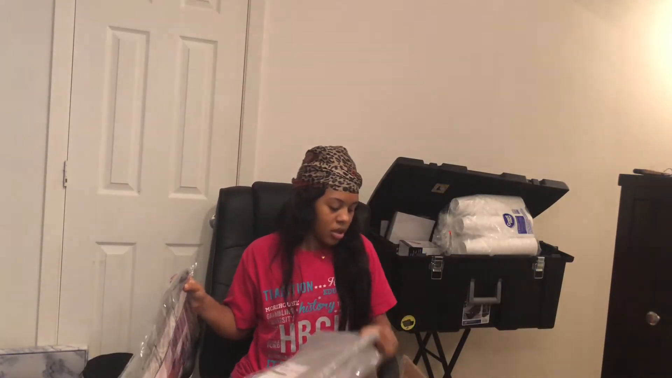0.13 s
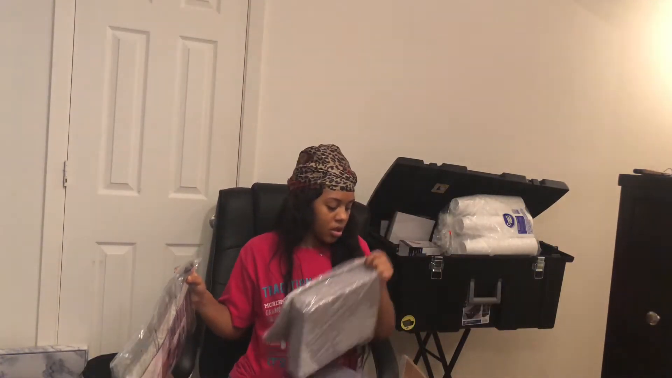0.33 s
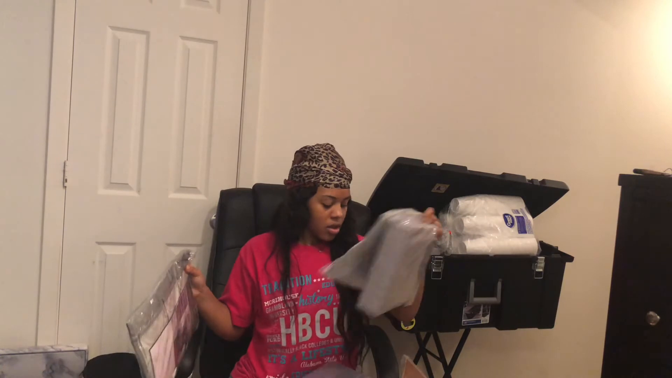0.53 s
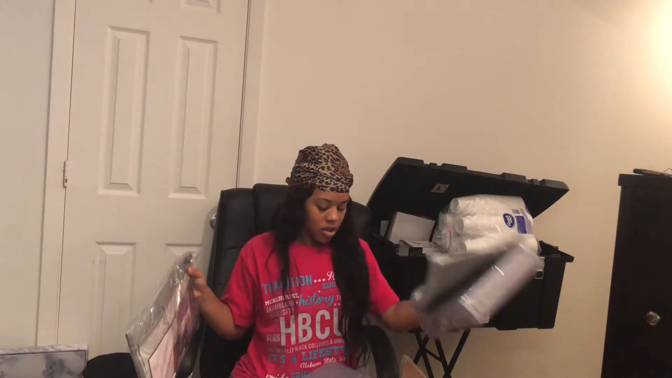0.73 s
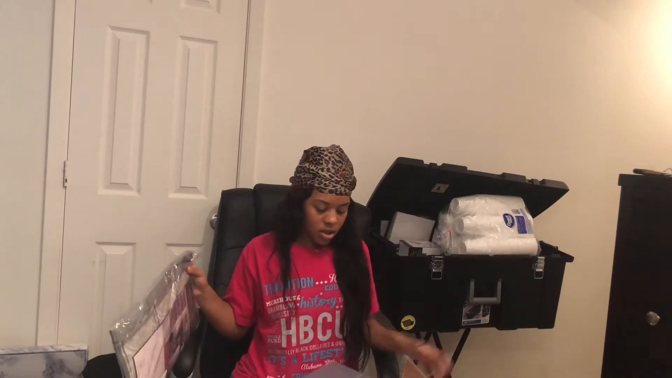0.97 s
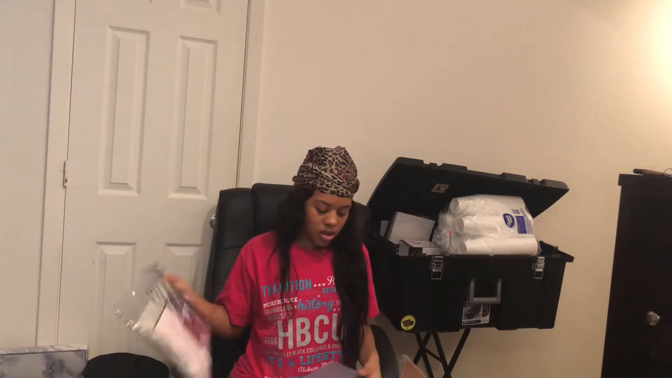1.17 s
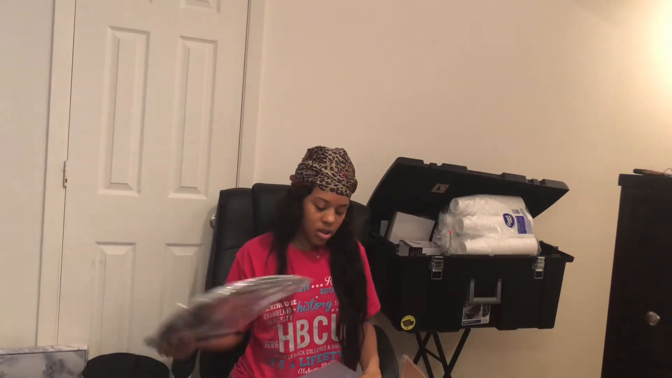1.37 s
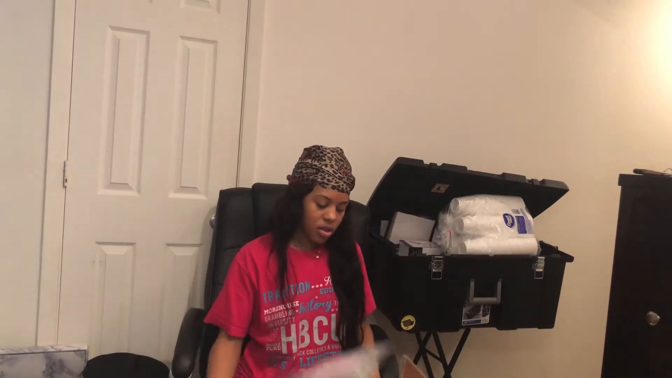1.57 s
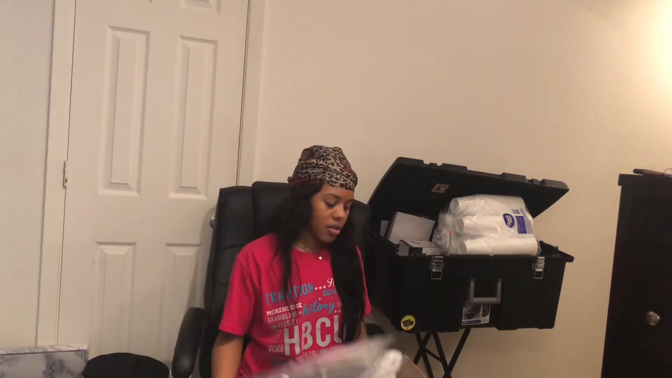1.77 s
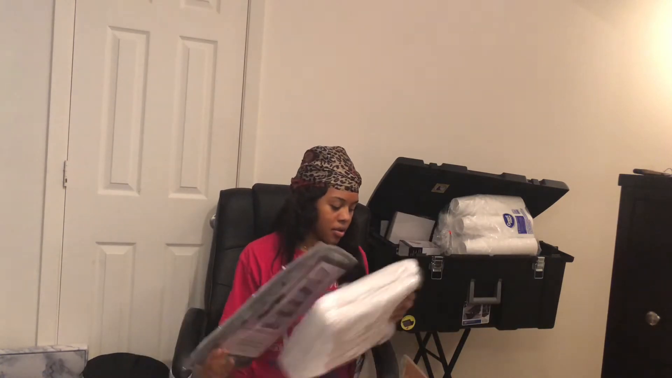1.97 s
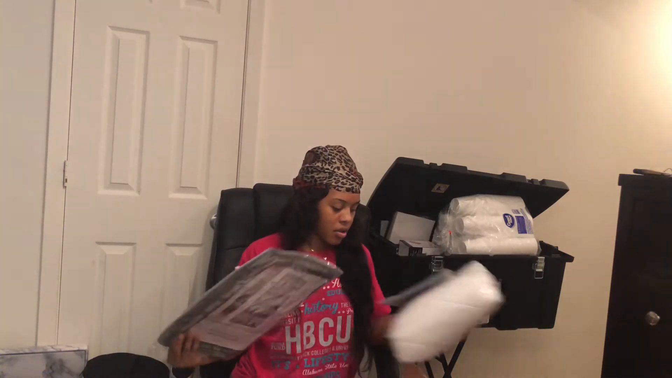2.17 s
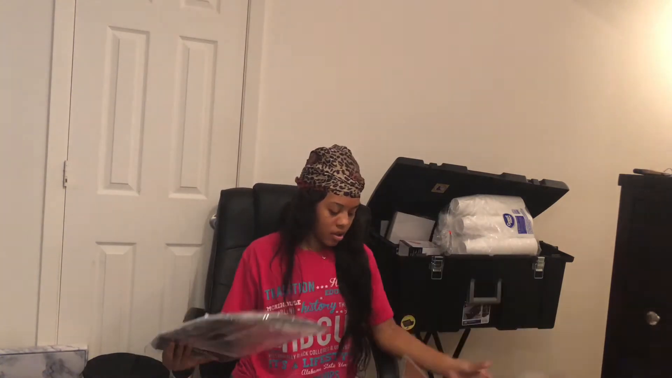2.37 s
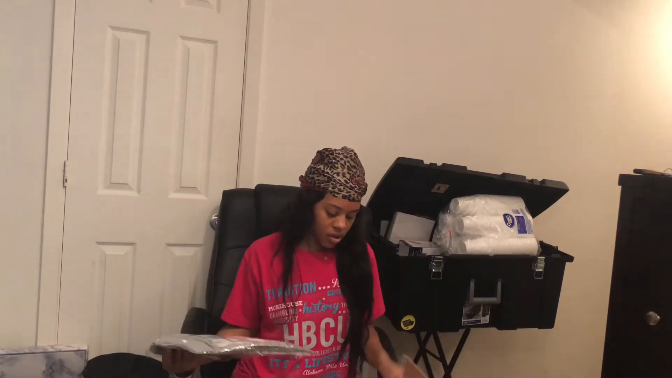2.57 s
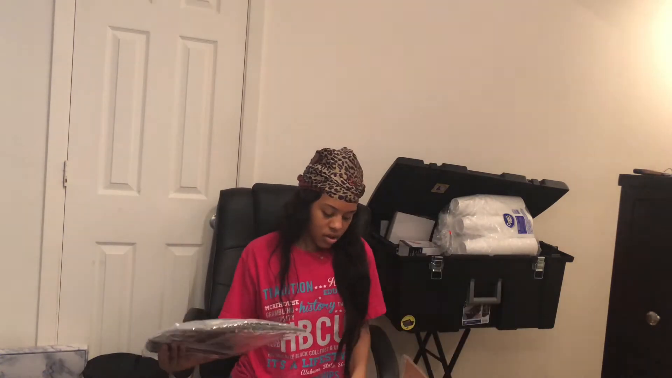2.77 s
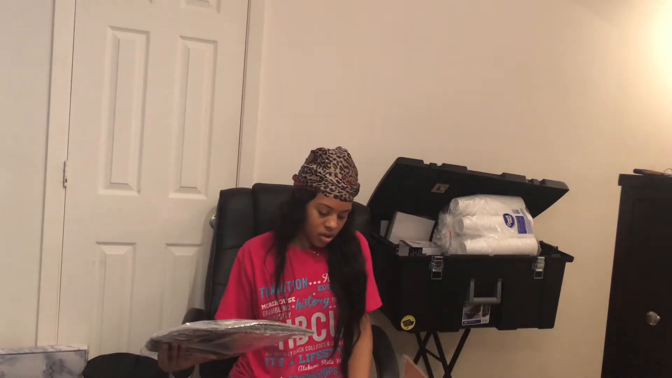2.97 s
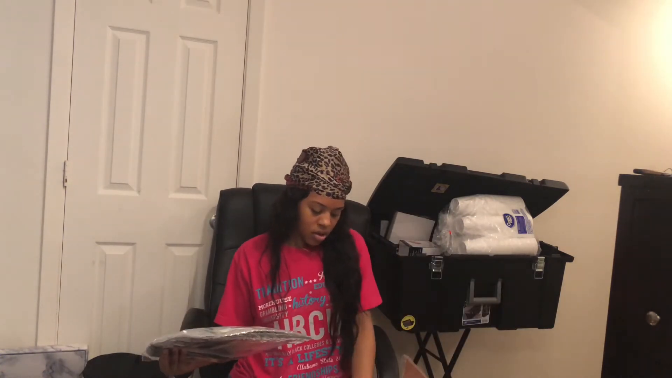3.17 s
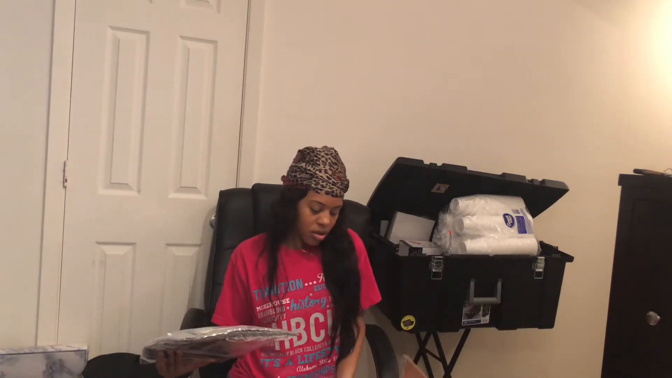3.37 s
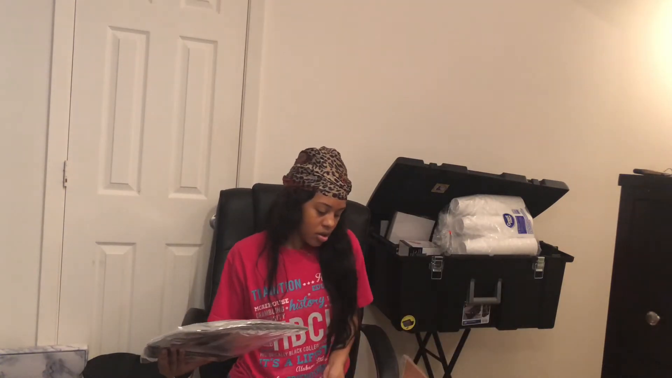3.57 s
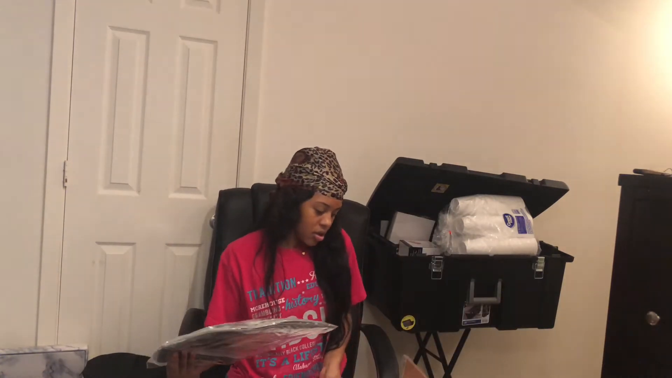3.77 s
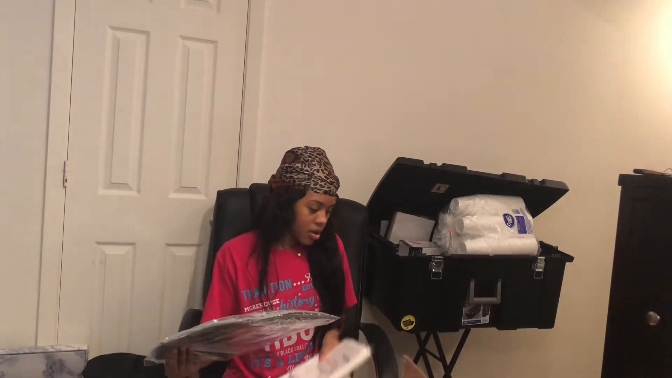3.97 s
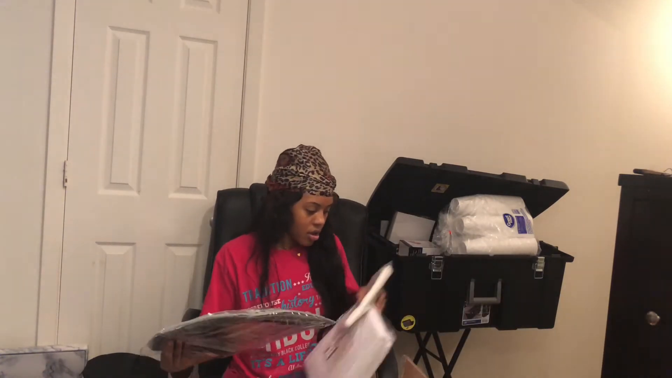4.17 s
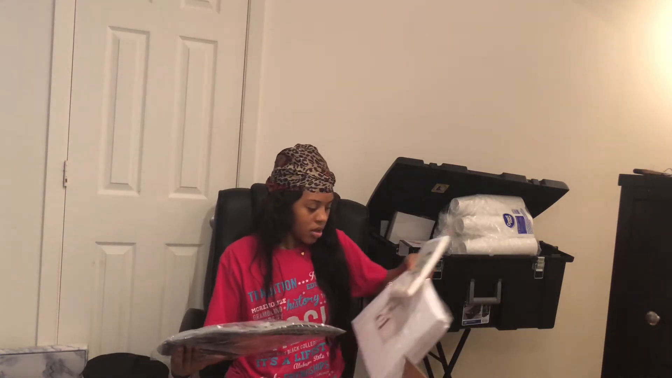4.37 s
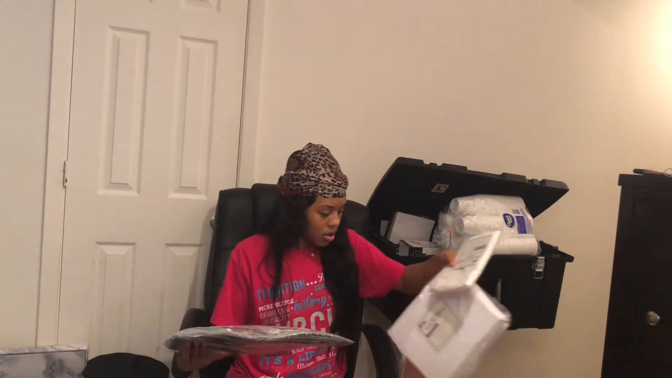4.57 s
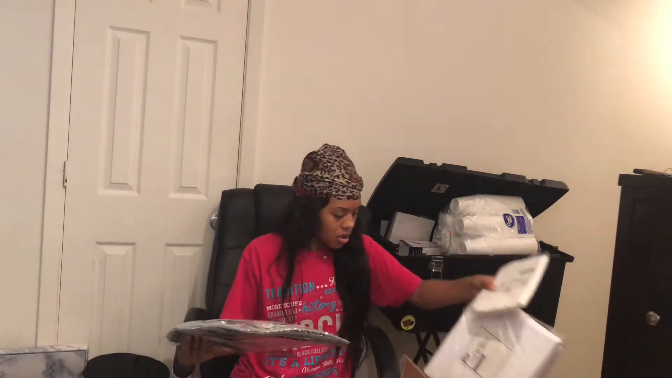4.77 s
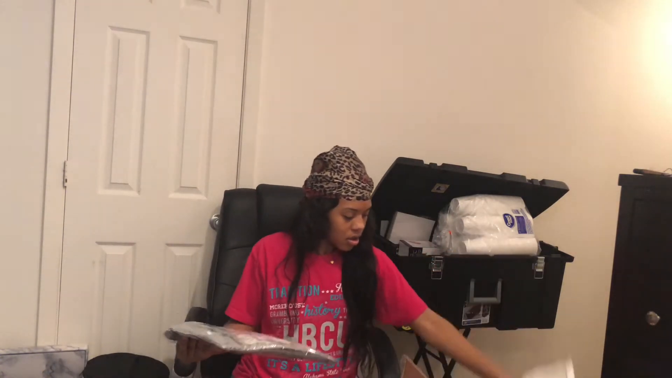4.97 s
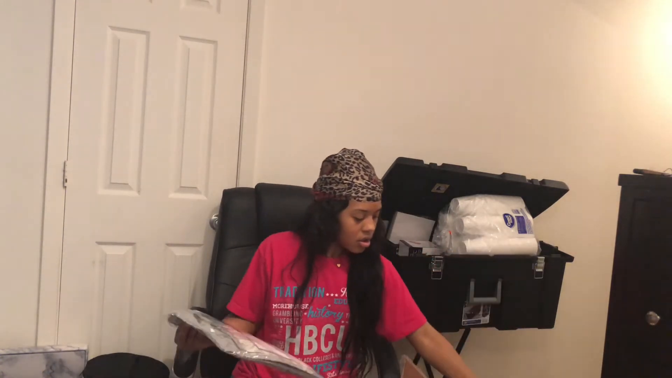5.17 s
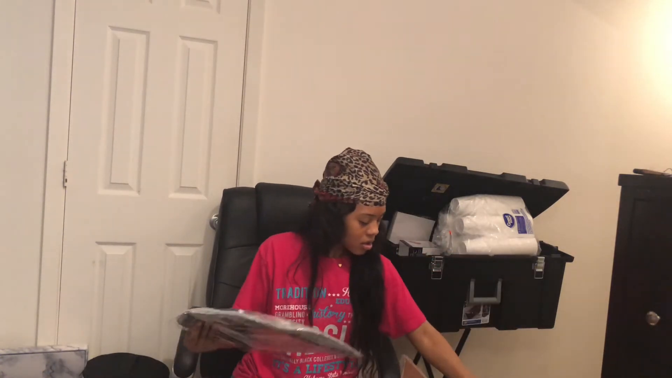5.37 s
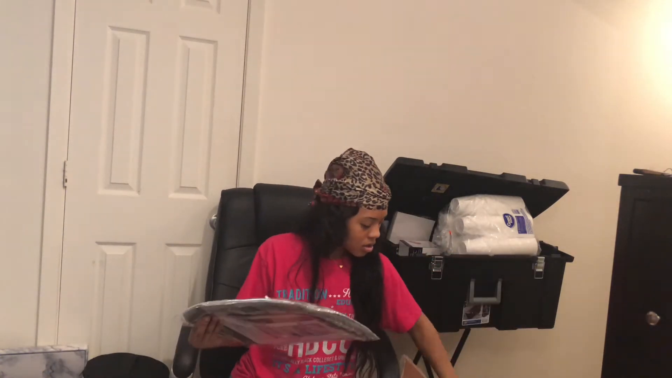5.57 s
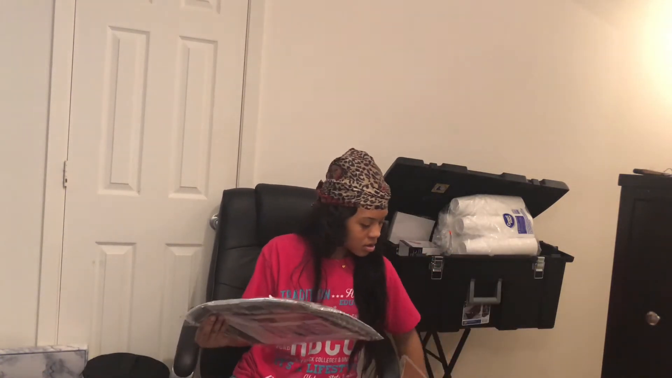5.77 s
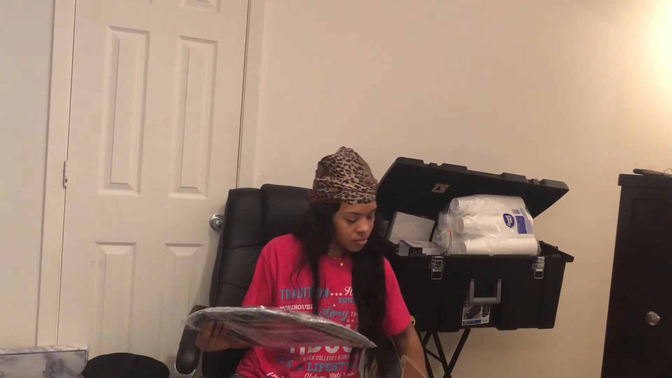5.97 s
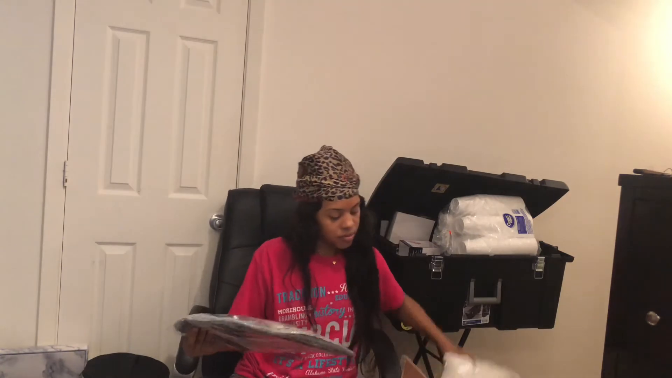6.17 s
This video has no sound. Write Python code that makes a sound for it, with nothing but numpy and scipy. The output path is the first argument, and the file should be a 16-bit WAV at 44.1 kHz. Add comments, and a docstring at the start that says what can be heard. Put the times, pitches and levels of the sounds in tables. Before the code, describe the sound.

In a small, quiet bedroom, thin plastic wrap crinkles and snaps sharply as flat packs are handled. Packs land on a pile with crisp crushes and short dull thuds, the heaviest about two and a half seconds in. Light rustling follows, then another landing, and finally a hand knocks faintly inside a cardboard box. The microphone is a few steps away, catching a short room tail.

```python
"""Thin plastic wrap crinkles and snaps close to the hands; flat packs are picked up, dropped on a pile and held.
Bending film is clumps of tiny buckles over hiss, and a crease is a short burst of filtered noise.
A landing crushes the wrap, rings the filling's damped modes and puffs out air; film squeaks faintly at times.
Late on, a hand knocks about in a cardboard box. Soft, still air lies under everything.
It is a small bedroom with the microphone a few steps away, so echoes and a short tail follow the sounds."""
import sys
import numpy as np
from scipy import signal
from scipy.fft import rfft, irfft, next_fast_len
from scipy.io import wavfile
from scipy.ndimage import uniform_filter1d

SR = 44100
rng = np.random.default_rng(int(sys.argv[2]) if len(sys.argv) > 2 else 0)


def dump(signal):
    """Clip the signal to [-1, 1] and save it as 16-bit WAV at the path in sys.argv[1]."""
    limited = np.clip(np.atleast_2d(signal).T, -1, 1)
    pcm = np.round(limited * 32767).astype(np.int16)
    wavfile.write(sys.argv[1], SR, pcm)


N = 273861
TIME = np.arange(N) / SR
CUTOFF_HZ = 16000   # upper limit of the snaps and of the whole sound

# All table levels are relative: the functions and the room add their own gains.
# a pack is bumped in the hand or lap:
# (time [s], thud level [dB], hardness of the contact as a low-pass [Hz], crush level of the wrap [dB])
BUMPS = [(0.0185, -43, 2500, -32.5), (0.1413, -34, 1800, -38.5), (0.2623, -26, 1230, -43),
         (1.83, -26.5, 1210, -33), (3.969, -36.5, 600, -60), (4.2725, -45, 1000, -47)]
# a pack lands on one edge and tips flat:
# (edge time [s], edge crush level [dB], edge thud level [dB],
#  flat time [s], flat crush level [dB], flat thud level [dB], level of the puff of air [dB])
LANDINGS = [(1.026, -29, -25.5, 1.098, -25.5, -17, -38), (1.61, -46, -31, 1.674, -50, -35, -50),
            (2.486, -36, -24, 2.543, -19.5, -9, -47), (5.023, -40, -44, 5.048, -34.5, -22, -42)]
# a hand feels about in a cardboard box: (time [s], level [dB], hardness of the contact as a low-pass [Hz])
KNOCKS = [(5.651, -41, 1700), (5.664, -32.5, 460), (5.808, -38.5, 780), (5.852, -34.5, 2530),
          (5.872, -45.5, 1200), (5.972, -36.5, 484), (6.021, -46, 600), (6.074, -45, 250)]
BUMP_SWELL_S = 0.0018   # rise of a bump's crush and of a clack


def from_db(db):
    """Decibels to gain."""
    return 10 ** (np.asarray(db) / 20)


def rms_one(x):
    """Scale to an rms of 1."""
    return x / np.sqrt(np.mean(x ** 2) + 1e-20)


def butter(x, hz, kind, order=2):
    """Causal low-, high- or band-pass."""
    sections = signal.butter(order, np.clip(hz, 10, .48 * SR), kind, fs=SR, output="sos")
    return signal.sosfilt(sections, x)


def coloured(x, spectrum):
    """Give x a spectrum, with minimum phase so that nothing sounds early; rms 1."""
    hz, db = np.transpose(spectrum)
    size = 2 * next_fast_len(N)
    bins = np.maximum(np.arange(size // 2 + 1) * SR / size, 1)
    gain = from_db(np.interp(np.log(bins), np.log(hz), db))
    cepstrum = irfft(np.log(gain))
    # the doubled causal half of the cepstrum gives the minimum-phase response
    response = np.exp(rfft(2 * cepstrum[:size // 2], size))
    return rms_one(irfft(rfft(x, size) * response)[:N])


def drift(knots_per_s):
    """Chance values joined by straight lines, with a spread of 1 at the knots."""
    knots = rng.standard_normal(N)
    return np.interp(TIME * knots_per_s, np.arange(N), knots)


def surge(s, swell, fade, hold=0):
    """Rises to 1 at time s, holds and dies away; rise and fall are exponential."""
    before = (s - TIME) / swell
    after = (TIME - s - hold) / fade
    return np.exp(-np.clip(np.maximum(before, after), 0, 20))


def ring(x, modes):
    """A unit click sets each mode ringing at its level; neighbouring modes swing in opposite senses."""
    out = 0
    for k, (hz, db, t60) in enumerate(modes):
        r = from_db(-60 / (t60 * SR))   # decay per sample
        w = 2 * np.pi * hz / SR
        mode = signal.lfilter([0, r * np.sin(w)], [1, -2 * r * np.cos(w), r * r], x + 1e-18)
        out = out + (-1) ** k * from_db(db) * mode
    return out


def add(track, s, sound):
    """Mix a short sound into the track at time s."""
    start = max(int(s * SR), 0)
    track[start:start + len(sound)] += sound[:N - start]


def room(x, wet_db):
    """Near echoes, then a diffuse tail that builds up in a few milliseconds and whose treble dies first."""
    # walls and furniture close by: (delay [s], level [dB])
    near_echoes = [(.0022, -27), (.0051, -26)]
    t60_s, treble_t60_s, wall_cut_hz = 0.36, 0.21, 7000
    t = TIME[:SR // 2]
    noise = rng.standard_normal(len(t))
    dull = butter(noise, wall_cut_hz, "low", order=1)
    treble = noise - dull
    tail = dull * np.exp(-np.log(1000) * t / t60_s) + treble * np.exp(-np.log(1000) * t / treble_t60_s)
    tail = tail * (1 - np.exp(-t / .004))
    response = from_db(wet_db) * tail / np.linalg.norm(tail)
    for delay, db in near_echoes:
        add(response, delay, from_db([db]))
    return x + signal.fftconvolve(x, response)[:N]


def handling():
    """Levels in dB of the crinkle, its top octave and the flexing: every move swells, holds and settles."""
    # a hand lifts, turns or shifts a pack: (start [s], length [s], swell [s], crinkle level [dB],
    #  top octave against the crinkle [dB], flexing of the pack against the crinkle [dB])
    moves = [(0, 0.18, .01, -49, 0, -6), (0.236, .16, .02, -54.5, 2, -8),
             (0.439, 0.13, .02, -62.5, -7, -4.5), (0.826, 0.053, 0.044, -51.5, 1, -12.5),
             (0.913, 0.097, .02, -55.5, -6, -11), (1.14, 0.096, .02, -47.5, -3, -11),
             (1.335, .16, .015, -61, -4, 0.5), (1.638, .04, 0.02, -47.5, -2.5, 2.5),
             (1.777, 0.11, 0.068, -52, 3, -1), (1.962, .05, 0.018, -60, 3, 4),
             (2.348, 0.057, 0.037, -57.5, -3.5, 0), (2.591, .32, .02, -52, 1.5, -4.5),
             (2.953, 0.13, .02, -59.5, 1, -4.5), (3.147, 0.062, 0.027, -55, 0.5, 0.5),
             (3.239, .11, .02, -53, 2, -4), (3.532, 0.18, 0.065, -58.5, 2.5, -7.5),
             (3.832, 0.019, 0.015, -56.5, 2.5, -6.5), (3.939, 0.15, 0.013, -56.5, 2, -5.5),
             (4.154, 0.077, .02, -61, -2, -11), (4.484, 0.079, 0.069, -63, 1, -10),
             (4.636, 0.055, 0.014, -68.5, -2, -12), (4.88, .04, .015, -59.5, 2, -9),
             (4.971, 0.044, .03, -52.5, 3.5, -18), (5.071, 0.05, .02, -40, 3, -6),
             (5.172, 0.17, .02, -50, 2.5, -5), (5.526, 0.037, .05, -57.5, 0, -5.5),
             (5.82, .23, 0.075, -64, -2.5, 6), (6.155, 0.028, 0.02, -54.5, -9, 1)]
    holding_db, holding_crisp_db, holding_flex_db = -71, -5, 0   # a pack that is only held still stirs
    settle_s = 0.045   # after a move the film relaxes
    waver_db, wavers_per_s = 1.65, 30   # the pressure of the hand is never even
    power = from_db(holding_db + np.array([[0], [holding_crisp_db], [holding_flex_db]])) ** 2
    for s, length, swell, db, crisp_db, flex_db in moves:
        peaks = from_db(db + np.array([[0], [crisp_db], [flex_db]]))
        power = power + peaks ** 2 * surge(s, swell, settle_s, length) ** 2
    return 10 * np.log10(power) + waver_db * drift(wavers_per_s)


def buckles(per_s, spread_db, clump_db, rub):
    """Tiny buckles of uneven size come in clumps, over the hiss of sliding film; the slow level is even."""
    sizes = from_db(spread_db * np.minimum(rng.exponential(1, N), 4)) * rng.choice([-1, 1], N)
    happens = rng.random(N) < per_s / SR
    clicks = sizes * happens * from_db(clump_db * drift(350))
    clicks = clicks / np.sqrt(uniform_filter1d(clicks ** 2, size=1800) + 1e-6)
    return (clicks + rub * rng.standard_normal(N)) / np.sqrt(1 + rub ** 2)


def crinkle(level_db, crisp_db):
    """Folds buckle with a dull tick; small wrinkles join them in the top, which has its own level."""
    # how the film moves: (time [s], smooth sliding against buckling [dB])
    sliding = [(0, -8), (1.1, -2), (1.8, -9), (2.7, -1.5), (3.1, -4), (3.6, -10), (4.1, 0.5), (4.9, -13),
               (5.1, 17), (5.4, -3)]
    # spectrum of bending film: (frequency [Hz], density [dB per Hz])
    film_spectrum = [(300, -17), (700, 1.5), (1300, 3), (2400, 3.5), (3600, 4.5), (5500, 3.5), (8000, -3.5),
                     (11000, -7), (16000, -8)]
    s, rub_db = np.transpose(sliding)
    rub = from_db(np.interp(TIME, s, rub_db))
    folds, wrinkles = (coloured(buckles(per_s=1400, spread_db=1.5, clump_db=5.5, rub=rub), film_spectrum)
                       for _ in range(2))
    body = butter(folds, 7600, "low", order=3)
    top = butter((folds + wrinkles) / np.sqrt(2), 6140, "high", order=3)
    return from_db(level_db + 2.0) * (body + from_db(crisp_db + 2.5) * top)


def flexing(level_db):
    """Broad panels of the pack flap and rub against cloth."""
    # spectrum of the panels: (frequency [Hz], density [dB per Hz])
    panel_spectrum = [(30, -32), (70, -13), (110, -3.5), (180, 2), (480, 0.5), (800, -3), (1500, -7.5),
                      (3000, -22)]
    panels = buckles(per_s=700, spread_db=2, clump_db=3.5, rub=0.92)
    return from_db(level_db + 1.5) * coloured(panels, panel_spectrum)


def still_air():
    """Steady noise, strongest in the bass, for the quiet air of the room."""
    # spectrum of the air: (frequency [Hz], density [dB per Hz])
    air_spectrum = [(15, -39), (35, -8.5), (75, 1), (160, -6.5), (350, -8), (500, -13), (1500, -22.5),
                    (7500, -54), (16000, -69)]
    rms_db = -65
    return from_db(rms_db) * coloured(rng.standard_normal(N), air_spectrum)


def pack_contacts():
    """Every blow on a pack's filling, two for each landing: (time [s], level [dB], hardness [Hz])."""
    edge_hz, flat_hz = 1450, 576
    blows = [(s, db, hz) for s, db, hz, _ in BUMPS]
    for edge_s, _, edge_db, flat_s, _, flat_db, _ in LANDINGS:
        blows += [(edge_s, edge_db, edge_hz), (flat_s, flat_db, flat_hz)]
    return blows


def bumps(events, body, gain_db, uneven_db, scuff_db):
    """A soft push and a short scuff ring the body, a little differently each time, and the room's modes."""
    # standing waves of the room: (frequency [Hz], level [dB], T60 [s])
    standing_waves = [(81, -21, .28), (150, -24, .17), (186, -20, .17), (237, -22, .2)]
    out, t = np.zeros(N), TIME[:SR // 2]
    for s, db, hz in events:
        scuff = from_db(scuff_db) * rng.standard_normal(len(t)) * np.exp(-t / 0.013)
        contact = (t == 0) + scuff
        push = from_db(db + gain_db) * butter(contact + 1e-18, hz, "low")
        modes = [(f, level + uneven_db * rng.standard_normal(), t60) for f, level, t60 in body]
        add(out, s, ring(push, modes + standing_waves))
    return butter(out, 67, "high")


def pack_thuds():
    """The filling of a bumped or landing pack rings in short, heavily damped modes."""
    # damped modes of a filled pack: (frequency [Hz], level before chance variation [dB], T60 [s])
    pack_modes = [(159, -9.5, 0.045), (232.3, -5, 0.09), (325, -5, 0.066), (385, 2.5, 0.026),
                  (557, -1.5, 0.04), (820, 5.5, 0.0093), (1190, -1, 0.014)]
    return bumps(pack_contacts(), pack_modes, gain_db=-7, uneven_db=2.0, scuff_db=-34.5)


def crushes():
    """A landing crushes creases steadily as the pack tips, then in a rush; a bump does so briefly."""
    # spectrum of crushed wrap: (frequency [Hz], density [dB per Hz])
    crushed_spectrum = [(30, -12), (70, -7), (180, 10), (500, 1), (1100, 2.5), (2200, 0), (4000, 0),
                        (6000, 0), (10000, -5.5), (16000, -9)]
    edge_swell_s, edge_fade_s, flat_swell_s, flat_fade_s = 0.0012, 0.024, 0.0041, 0.0078
    wrap_lead_s, wrap_hold_s = 0.0055, 0.011   # the loose wrap is crushed from just before the filling hits
    bump_fade_s = 0.0054
    power = sum((from_db(db) * surge(s, BUMP_SWELL_S, bump_fade_s)) ** 2 for s, _, _, db in BUMPS)
    for edge_s, edge_db, _, flat_s, flat_db, _, _ in LANDINGS:
        tipping = surge(edge_s, edge_swell_s, edge_fade_s, flat_s - edge_s)
        rush = surge(flat_s - wrap_lead_s, flat_swell_s, flat_fade_s, wrap_hold_s)
        power = power + (from_db(edge_db) * tipping) ** 2
        power = power + (from_db(flat_db) * rush) ** 2
    creasing = buckles(per_s=10000, spread_db=3.0, clump_db=4.5, rub=2.2)
    return from_db(0.28) * np.sqrt(power) * coloured(creasing, crushed_spectrum)


def small_snaps(level_db, count):
    """Chance snaps, one per equal stretch of time, that follow the level of the handling."""
    above_crinkle_db, spread_db = 18.5, 4.5
    middle_hz, spread_octaves = 9000, 0.56
    at = ((np.arange(count) + rng.random(count)) * N / count).astype(int)
    size, pitch = np.clip(rng.standard_normal((count, 2)), -2, 2).T
    db = level_db[at] + above_crinkle_db + spread_db * size
    hz = np.minimum(middle_hz * 2 ** (spread_octaves * pitch), CUTOFF_HZ)
    return list(zip(at / SR, db, hz))


def snaps(level_db, fade_s, width, slip_db):
    """A crease gives way with one jump and a run of tiny slips, within a few milliseconds."""
    # big creases snapping through: (time [s], level [dB], centre of the band [Hz])
    big_snaps = [(0.0194, -14, 13500), (0.1008, -21.5, 9100), (.2008, -17.5, 11900), (0.44, -26, 8700),
                 (0.447, -28, 8700), (1.3535, -29.5, 4380), (1.451, -25, 5100), (1.625, -22, 7100),
                 (1.7758, -24.5, 6160), (1.8298, -18.5, 5200), (1.897, -22.5, 11400), (2.008, -30, 2820),
                 (2.1681, -34, 10200), (2.3436, -38, 5900), (2.4, -25.5, 8000), (3.0173, -27.5, 9400),
                 (3.0686, -26.5, 9000), (3.212, -27, 10100), (3.269, -26.5, 10000), (3.3287, -25, 11000),
                 (3.5314, -30, 11000), (3.6756, -34, 11000), (4.2755, -26.5, 3600), (4.631, -38.5, 8400),
                 (4.6896, -38, 3900), (4.816, -41, 9000), (4.9857, -25.5, 13000), (5.022, -23, 7000),
                 (5.3722, -24, 6250)]
    out, t = np.zeros(N), np.arange(512) / SR
    for s, db, hz in big_snaps + small_snaps(level_db, count=60):
        slips = from_db(slip_db) * rng.standard_normal(len(t)) * np.exp(-t / fade_s) + (t == 0)
        span = 1 + width * from_db(0.18 * (db + 29))   # a big crease sounds over a wider band
        snap = butter(slips, [hz / span, hz * span], "band", order=1)
        snap = butter(snap, CUTOFF_HZ, "low")
        add(out, s, 2 * from_db(db) * snap / np.linalg.norm(snap))
    return out


def squeaks(t60_at_1khz):
    """Film sticks and slips on film: a thin, unsteady tone that swells and fades."""
    # faint squeaks of sliding film: (time of the middle [s], frequency [Hz], level [dB], half length [s])
    squeak_rows = [(0.452, 2100, -68, 0.17), (6.063, 1855, -65, 0.07)]
    out = 0
    for s, hz, db, half in squeak_rows:
        tone = rms_one(ring(rng.standard_normal(N), [(hz, 0, t60_at_1khz * 1000 / hz)]))
        out = out + from_db(db) * np.exp(-((TIME - s) / half) ** 2) * tone
    return out


def whumps(swell_s, fade_s):
    """The cushion of air under a landing pack escapes in one soft, deep puff."""
    # spectrum of the puff: (frequency [Hz], density [dB per Hz])
    puff_spectrum = [(20, -40), (40, 1), (80, -4.5), (110, -6), (135, -1), (220, -17), (600, -38)]
    lag_s = 0.02   # the puff peaks just after the pack lies flat
    level = sum(from_db(db) * surge(flat_s + lag_s, swell_s, fade_s) for _, _, _, flat_s, *_, db in LANDINGS)
    return level * coloured(rng.standard_normal(N), puff_spectrum)


def box_knocks():
    """Knocks of a hand ring the walls of the cardboard box."""
    # modes of the box: (frequency [Hz], level before chance variation [dB], T60 [s])
    box_modes = [(160, -9, .04), (380, -6, .03), (455, -12, .16), (760, -9, .025), (950, -7, .03),
                 (1430, -11, .02), (1790, -12, .015), (2800, -14, .01)]
    return bumps(KNOCKS, box_modes, gain_db=-2.5, uneven_db=4.0, scuff_db=-23.0)


def clacks(gain_db, low_hz, high_hz, fade_s):
    """Each knock on the cardboard starts with a dry, broad clack, stronger when the contact is hard."""
    level = sum(from_db(db + gain_db) * np.sqrt(hz / high_hz) * surge(s, BUMP_SWELL_S, fade_s)
                for s, db, hz in KNOCKS)
    return level * rms_one(butter(rng.standard_normal(N), [low_hz, high_hz], "band"))


def scene():
    """Film, packs and box in the room; the puffs and the still air are added without it."""
    level_db, top_db, flex_db = handling()
    film = crinkle(level_db, top_db - level_db) + flexing(flex_db) + crushes() + squeaks(t60_at_1khz=0.065)
    creases = snaps(level_db, fade_s=0.0017, width=0.56, slip_db=-12.5)
    knocks = box_knocks() + clacks(gain_db=-12, low_hz=396, high_hz=2270, fade_s=0.0078)
    in_room = room(film, wet_db=-12) + room(creases, wet_db=-8.0) + room(pack_thuds() + knocks, wet_db=-9.0)
    return (in_room + whumps(swell_s=0.016, fade_s=0.042) + still_air())[None]


def record(dry):
    """The top is cut steeply."""
    return signal.sosfilt(signal.ellip(10, .1, 70, CUTOFF_HZ, fs=SR, output="sos"), dry)


dry = scene()
out = record(dry)
dump(out)
```